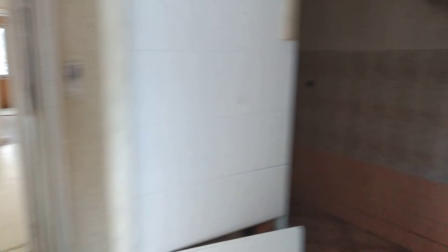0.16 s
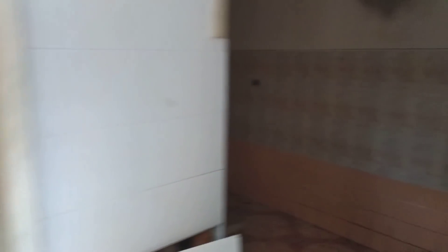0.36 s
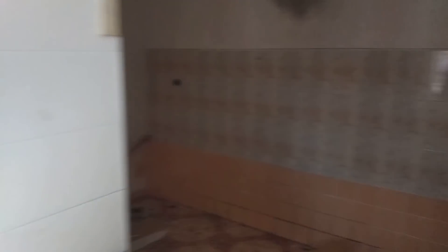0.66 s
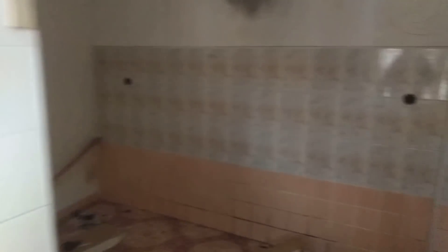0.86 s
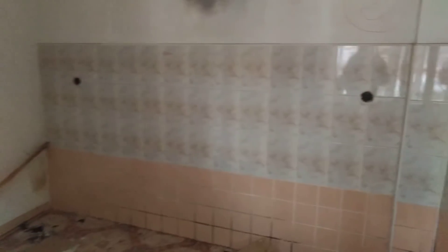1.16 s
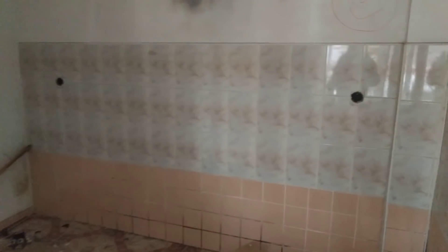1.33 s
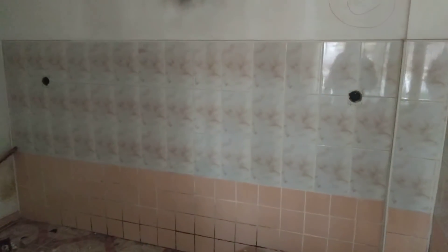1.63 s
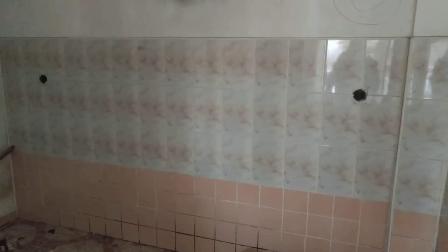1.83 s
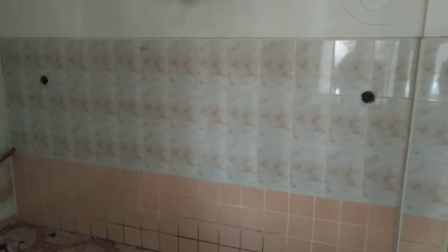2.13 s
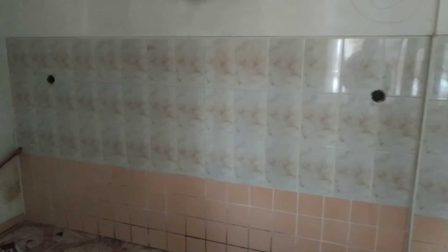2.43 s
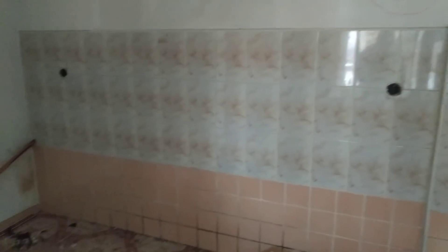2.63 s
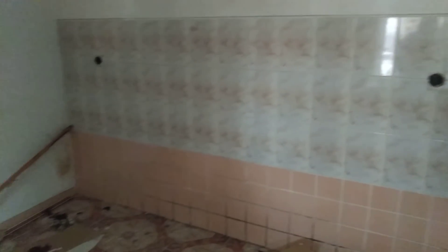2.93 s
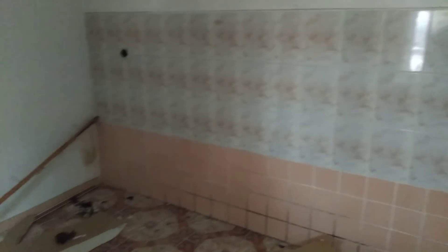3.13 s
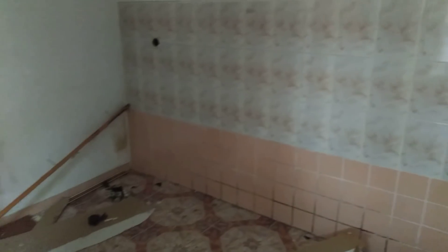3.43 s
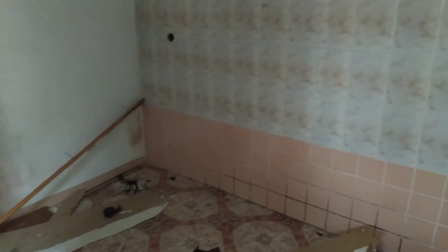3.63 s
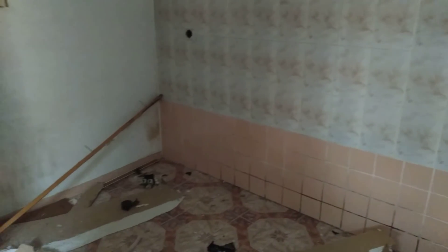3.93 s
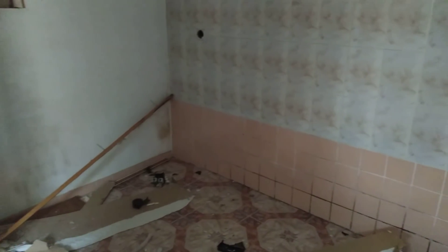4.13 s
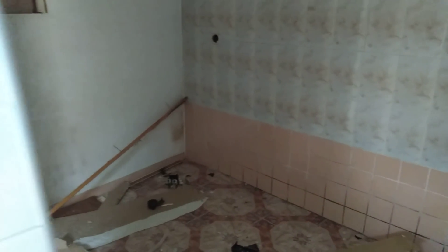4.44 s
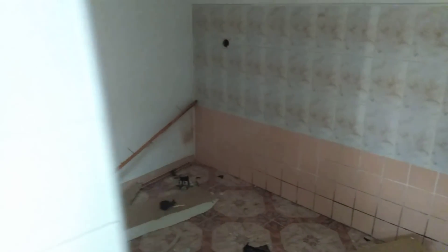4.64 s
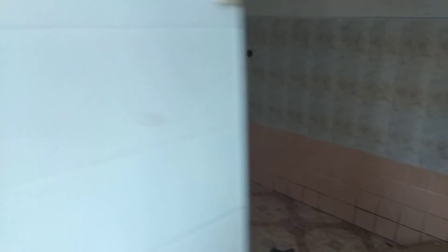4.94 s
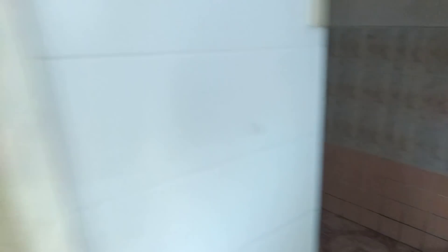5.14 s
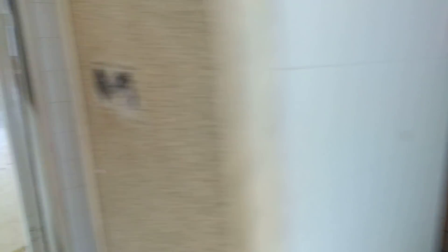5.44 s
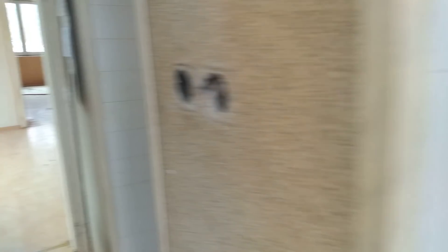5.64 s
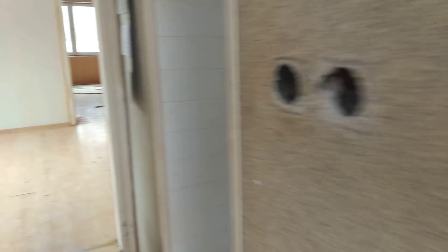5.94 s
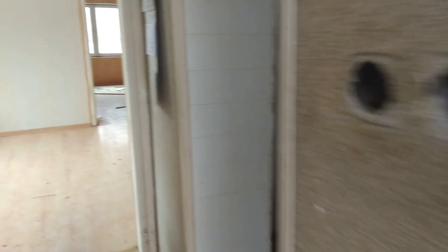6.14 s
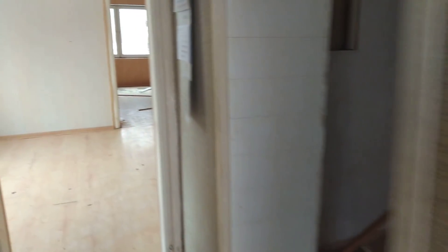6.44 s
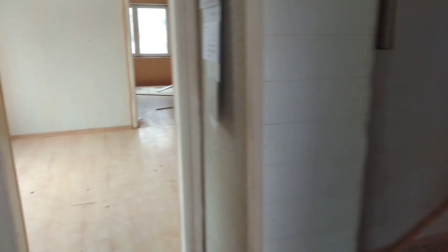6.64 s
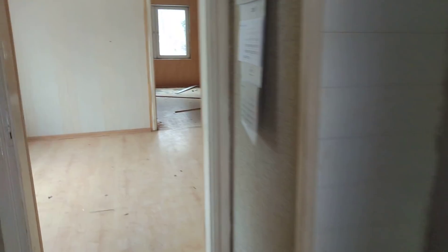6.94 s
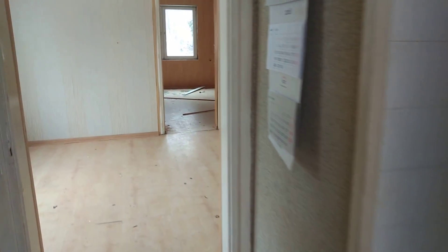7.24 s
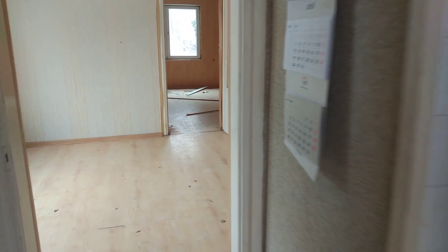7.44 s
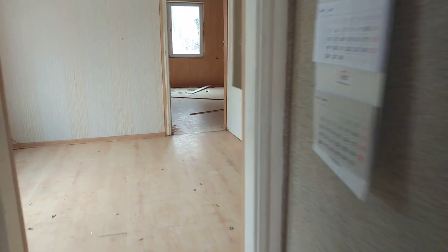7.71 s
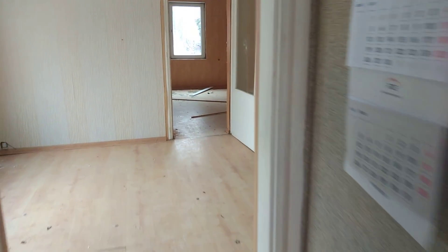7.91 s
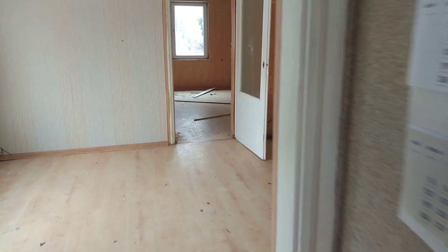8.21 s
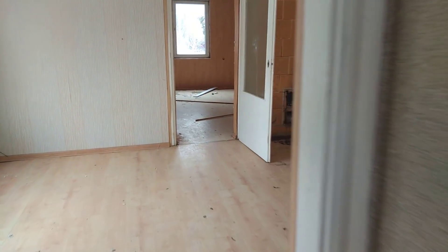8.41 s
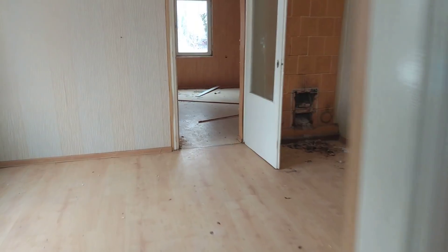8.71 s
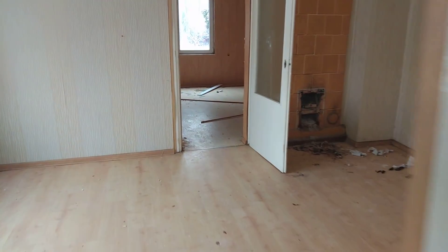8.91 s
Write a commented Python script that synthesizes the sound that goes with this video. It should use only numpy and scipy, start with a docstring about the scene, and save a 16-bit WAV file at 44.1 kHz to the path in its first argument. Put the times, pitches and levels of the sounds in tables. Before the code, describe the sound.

Someone walks slowly over plaster debris, grit and glass shards in empty, hard-walled rooms. After small snaps, a loud burst of crunching comes just after one second, followed by another crunch. Then it thins to light scrapes and isolated clicks, with soft heel thuds on hollow laminate near the end. Close microphone, short bright echoes, faint low rumble and hiss.

```python
"""Shoes grind over broken plaster, grit and glass shards in empty, hard-walled rooms, later over hollow laminate.
Close to the microphone, dense random grain fractures make the grind, and lone bright clicks make the crackle.
Snaps are ticks with fading noise echoes; shards chink as resonances, one faint low room tone rings among them,
and heels push low floor modes. Echoes follow from the walls. A wandering low rumble and a faint coloured hiss
lie under all. The whole level dips briefly at listed moments."""
import sys
import numpy as np
from scipy import signal
from scipy.fft import rfft, irfft
from scipy.io import wavfile

SR = 44100
rng = np.random.default_rng(int(sys.argv[2]) if len(sys.argv) > 2 else 0)


def unload_wav(signal):
    """Save mono or channel-first audio to the path in sys.argv[1] as 16-bit WAV at rate SR, clipped to [-1, 1]."""
    wavfile.write(
        sys.argv[1],
        SR,
        np.round(np.clip(np.atleast_2d(signal).T, -1, 1) * 32767).astype(np.int16),
    )


def nominal_scale(level):
    """Amplitude ratio for a level in decibels (scalar or array-like)."""
    x = np.asarray(level, float) / 20
    return 10 ** x


N = 399987


def at_hz(points, hz):
    """Straight lines on a log-frequency axis."""
    point_hz, values = np.transpose(points)
    return np.interp(np.log(hz), np.log(point_hz), values)


def rms_one(x):
    """Scale to rms 1."""
    return x / np.sqrt(np.mean(x ** 2) + 1e-20)


def in_time(rows):
    """Columns of a curve at every sample."""
    s, *columns = np.transpose(rows)
    return [np.interp(np.arange(N) / SR, s, c) for c in columns]


def band(x, low, high):
    """Butterworth band-pass."""
    return signal.sosfilt(signal.butter(2, [low, high], "band", fs=SR, output="sos"), x + 1e-18)


def ring(clicks, hz, t60):
    """A unit click sets a decaying sine of starting height 1 ringing."""
    radius, turn = nominal_scale(-60 / (t60 * SR)), 2 * np.pi * hz / SR
    return signal.lfilter([0, np.sin(turn)], [1, -2 * radius * np.cos(turn), radius ** 2], clicks + 1e-18)


def drift(rate):
    """Slow random curve: straight lines between knots of spread 1, rate knots per second."""
    knots = rng.standard_normal(int(N / SR * rate) + 2)
    return np.interp(np.arange(N) * rate / SR, np.arange(len(knots)), knots)


def four_zones(dull_db, low_db, bright_db, middle_db):
    """Zone levels; the high middle is set against the mean of its neighbours."""
    return [dull_db, low_db, (low_db + bright_db) / 2 + middle_db, bright_db]


# The dull, low middle, high middle and bright zones of debris sound.
# One list per column: centre_hz; width_hz
ZONE_CENTRE_HZ = [450, 1750, 4600, 10000]
ZONE_WIDTH_HZ = [800, 2000, 4000, 7000]


def band_db(zones_db, low, high):
    """Level in one band, read between the zone levels spread evenly over their widths."""
    centre = np.log(low * high) / 2
    share = [np.interp(centre, np.log(ZONE_CENTRE_HZ), one) for one in np.eye(4)]
    per_hz = [db - 10 * np.log10(width) for db, width in zip(zones_db, ZONE_WIDTH_HZ)]
    thin_db = 2.8 * max(0, np.log2(300 / low))     # small pieces radiate little bass
    return np.tensordot(share, per_hz, axes=1) + 10 * np.log10(high - low) - thin_db


# Grit under the soles, close by; straight lines between the rows.
# Columns: time_s, coarse_grit_db, fine_grit_db, dull_rubble_db
GRIT = [(0.0, -43.5, -42, -52), (0.25, -51.5, -51, -58), (0.45, -52.5, -49, -54), (0.58, -48, -38, -46),
        (0.66, -44.5, -43.5, -56), (0.78, -49, -50, -58.5), (1.03, -64.5, -51, -46), (1.16, -38, -25, -39),
        (1.24, -35.5, -22.5, -40), (1.31, -21.5, -21.5, -34), (1.44, -25, -28, -46),
        (1.51, -33, -34.5, -49.5), (1.72, -41.5, -36, -58), (1.87, -31, -28.5, -38),
        (2.14, -41, -42.5, -52), (2.27, -53.5, -57, -57), (2.63, -59, -49.5, -62),
        (2.88, -62.5, -56, -67.5), (3.31, -45.5, -43.5, -62), (3.53, -53, -37.5, -66),
        (3.81, -57.5, -45.5, -65.5), (4.12, -65, -61, -66), (4.29, -35.5, -39.5, -56),
        (4.5, -42, -41, -60.5), (4.65, -51, -40.5, -57.5), (4.9, -46.5, -45.5, -48.5),
        (5.15, -59, -51.5, -57), (5.3, -53, -39, -61), (5.51, -46.5, -37.5, -39),
        (5.68, -54.5, -62.5, -61.5), (6.04, -59.5, -50, -59.5), (6.27, -45.5, -46, -52),
        (6.39, -52.5, -43, -51), (6.77, -58, -47.5, -56.5), (7.02, -62, -55, -60), (7.12, -63.5, -47, -51),
        (7.7, -43.5, -39, -53.5), (7.85, -45, -39.5, -48.5), (8.13, -51, -48, -53.5),
        (8.46, -66, -46, -52.5), (8.64, -44, -43.5, -53), (9.07, -55.5, -48.5, -50.5)]
GRIT_MIDDLE_DB = -3.5   # high middle of the grit against the mean of its neighbours
BAND_EDGES_HZ = np.geomspace(160, 15000, num=14)


def grind(per_s, patchy_db):
    """Dense random grain fractures; each band has its own grains and its own unevenness."""
    coarse_db, fine_db, dull_db = in_time(GRIT)
    zones = four_zones(dull_db, coarse_db, fine_db, GRIT_MIDDLE_DB)
    out, together = np.zeros(N), drift(40)
    for low, high in zip(BAND_EDGES_HZ, BAND_EDGES_HZ[1:]):
        fractures = rng.choice([-1, 1], N) * (rng.random(N) < per_s / SR)
        grains = rms_one(band(fractures, low, high))
        uneven_db = patchy_db * (together + drift(14))
        out += grains * nominal_scale(band_db(zones, low, high) + uneven_db)
    return out


def crackle():
    """Lone grains pop as bright clicks, in clumps; their strength follows the fine grit level."""
    fine_db = in_time(GRIT)[1]
    sizes = nominal_scale(3.1 * np.minimum(rng.exponential(1, N), 3)) * rng.choice([-1, 1], N)
    per_s = 55 * nominal_scale(6.0 * drift(8))     # the drifting rate makes the clumps
    pops = sizes * (rng.random(N) < per_s / SR)
    return band(pops * nominal_scale(fine_db + 17.5), 6000, 9800)


# Pieces snapping near the microphone; middle_db is the high middle against the mean of knock and snap.
# Columns: start_s, tick_peak_db, knock_echo_db, snap_echo_db, middle_db
SNAPS = [(0.045, -18.5, -39, -42.5, -9), (0.07, -13, -46, -32.5, -0.5), (0.393, -23.5, -72, -39, 10),
         (0.453, -25, -52, -32, -12), (0.505, -18, -42, -31, -16), (0.523, -17, -38.5, -35.5, -35),
         (0.544, -25, -43, -37, -3.5), (0.553, -9.5, -58, -34, -26), (0.571, -16.5, -36.5, -71, -28),
         (0.673, -21.5, -35.5, -38.5, -15), (0.98, -32, -48, -38, 10.5), (0.996, -30, -39, -21, 2),
         (1.071, -12, -34.5, -20.5, 2.5), (1.11, -21, -27, -20, -1), (1.226, -15, -27, -18, -6),
         (1.264, -3.5, -16.5, -18.5, -4), (1.338, 2.5, -19, -15, -5), (1.357, -3, -33, -26, -10),
         (1.679, -13, -22, -20, -8.3), (1.789, -6.5, -26.5, -25.5, -5), (1.899, -37, -28, -24, -3),
         (1.923, -20, -26, -25.5, -5), (2.175, -18.5, -50, -30, -2), (2.418, -30.5, -59, -47, 5.5),
         (2.594, -34, -61, -47, 4), (2.758, -23, -49.5, -38, -1), (2.891, -24, -54.5, -40, 1),
         (3.007, -27, -60, -32.5, 9.5), (3.125, -24.5, -35.5, -36, -6.5), (3.269, -17, -39, -29.5, -1),
         (3.296, -21, -53.5, -42, 16.5), (3.582, -20.5, -46, -38, 1), (3.605, -35, -44.5, -33.5, 4.5),
         (3.783, -35, -63, -46, 6), (3.972, -31, -59.5, -38, 7), (4.08, -28, -51, -39, 3),
         (4.125, -16, -29, -29, -0.7), (4.278, -21, -57, -27.5, 13.5), (4.319, -18, -33, -20, 2.5),
         (4.503, -16.5, -54, -34, 6), (4.674, -41, -41, -36, 2.3), (4.863, -27, -58, -43, 2),
         (5.106, -20, -35.5, -41.5, -4.5), (5.226, -41, -44.5, -42, -4), (5.266, -26, -43, -50, -6),
         (5.33, -17.5, -37, -34, -33), (5.408, -29, -73.5, -52, 20), (5.496, -18, -38.5, -30, -6),
         (5.601, -16.5, -37.5, -37.5, 0.1), (5.872, -7.5, -75, -38, -19), (6.104, -62, -64, -52, -3),
         (6.208, -38, -58, -41, -16), (6.242, -31, -35, -32, -18), (6.417, -25, -46.5, -36, -4.5),
         (6.799, -28, -57.5, -47, 9), (6.847, -26, -72, -45, 7), (6.96, -32, -41, -35.5, -4.5),
         (7.027, -21.5, -40.5, -41, -7.5), (7.116, -33, -42.5, -40.5, -5.5), (7.303, -23.5, -45.5, -36, -3),
         (7.543, -22, -70, -48, -13), (7.601, -33, -63, -37, -13), (7.659, -26, -45, -32.5, -5),
         (8.192, -32, -52, -46, -1), (8.423, -16, -38.5, -18.5, 0.1), (8.429, -3, -46, -23, -12),
         (8.443, -11, -39, -22.5, -2.8), (8.629, -42.5, -51, -38, -12), (8.803, -28, -43.5, -36, -5),
         (8.886, -21, -50.5, -31, -11), (8.893, -10, -67, -46, -14)]
# How long the hard walls hold an echo, also used by room().
# Columns: pitch_hz, t60_s
ECHO_T60 = [(150, 0.28), (700, 0.38), (3000, 0.45), (12000, 0.35)]
SNAP_DULL_DB = -9    # dull zone of a snap against its knock
DULL_FOLLOWS = 0.3   # the duller a snap, the more of it reaches the lowest zone


def cracks(tick_s, build_s):
    """Each snap is a tick of its own colour; its echoes are noise that builds up fast and dies band by band."""
    s, peak_db, knock_db, snap_db, middle_db = np.transpose(SNAPS)
    dull_db = knock_db + SNAP_DULL_DB + DULL_FOLLOWS * (knock_db - snap_db)
    zones = four_zones(dull_db, knock_db, snap_db, middle_db)
    total_db = 10 * np.log10(np.sum(nominal_scale(np.array(zones)) ** 2, axis=0))
    at = (s * SR).astype(int)
    white, out = rng.standard_normal((2, N)), np.zeros(N)
    quick, build = np.exp(-1 / (tick_s * SR)), np.exp(-1 / (build_s * SR))
    for k, (low, high) in enumerate(zip(BAND_EDGES_HZ, BAND_EDGES_HZ[1:])):
        level_db = band_db(zones, low, high)
        ticks, echoes = np.zeros(N), np.zeros(N)
        ticks[at] = nominal_scale(peak_db + level_db - total_db) ** 2 / 4     # a noisy tick peaks at about twice its rms
        echoes[at] = nominal_scale(level_db) ** 2
        fade = nominal_scale(-120 / (at_hz(ECHO_T60, np.sqrt(low * high)) * SR))     # 60 dB down in power after t60
        # powers of unrelated echoes add
        power = signal.lfilter([1], [1, -quick], ticks + 1e-18)
        power += signal.lfilter([1 - build], np.convolve([1, -fade], [1, -build]), echoes + 1e-18)
        whole_band = np.sqrt(SR / 2 / (high - low))     # makes up for the noise outside the band
        out += band(white[k % 2] * np.sqrt(power), low, high) * whole_band
    return out


# Blows on pieces of glass, tile and plaster; at 2.417 s a faint low room tone rings instead.
# Levels are relative, before the mix. Columns: start_s, blow_db
BLOWS = [(0.045, -20.5), (0.067, -25), (0.981, -8.5), (1.076, 0), (1.129, -3), (1.27, 7), (1.342, -3),
         (1.682, -8.5), (2.417, -12.5), (2.759, -32), (3.012, -19.5), (4.08, -23), (4.126, -20.5),
         (4.502, -15.5), (5.106, -26), (5.266, -28.5), (5.333, -17), (5.409, -25), (5.498, -23),
         (5.601, -11), (5.871, -7.5)]
# The resonances each blow sets ringing, one list per blow, in the same order:
# those of the struck piece, or at 2.417 s the single room tone.
# Columns: pitch_hz, width_hz, relative_db
RESONANCES = [
    [(1300, 500, -3), (13000, 500, 1)],
    [(7800, 900, 19), (11500, 400, 10), (13000, 500, 10)],
    [(7700, 200, 8), (9400, 50, 3), (12200, 80, 0), (12840, 60, -3)],
    [(9930, 100, -3), (12300, 50, -5), (13840, 60, -5)],
    [(6380, 40, 0)],
    [(7700, 300, -3), (6500, 200, -10), (10300, 200, -8)],
    [(1224, 150, 1), (2200, 350, 3)],
    [(800, 350, 1), (11900, 300, -3)],
    [(460, 10, -14)],
    [(3100, 500, 4)],
    [(7400, 900, 8), (6000, 500, 0)],
    [(7800, 900, 8), (1100, 400, -3)],
    [(2000, 300, 15), (1750, 200, 13)],
    [(6800, 1800, 3)],
    [(1150, 300, 4)],
    [(3500, 1200, 6)],
    [(3500, 1200, 6)],
    [(3500, 1200, 6)],
    [(3500, 1200, 6)],
    [(3994, 110, 9), (5006, 50, -2), (10360, 30, -8), (10840, 30, -10)],
    [(6000, 900, -24), (8947, 70, -2), (11900, 300, -3)],
]
SKIRT = 0.95   # a resonance falls away steeply beyond this many widths


def shards_and_room_tone():
    """One blow rings its list of resonances; a wide one dies fast and starts higher for the same energy."""
    out = np.zeros(N)
    for (s, blow_db), modes in zip(BLOWS, RESONANCES):
        tap, tone = np.zeros(SR // 2), np.zeros(SR // 2)
        tap[0] = nominal_scale(blow_db)
        for hz, width_hz, db in modes:
            t60 = np.log(1000) / (np.pi * width_hz)
            mode = band(ring(tap, hz, t60), hz - SKIRT * width_hz, hz + SKIRT * width_hz)
            tone += nominal_scale(db) * np.sqrt(width_hz / 50) * mode
        at = int(s * SR)
        out[at:at + SR // 2] += tone[:N - at]
    return out


# Heels on the floor; level_db sets the push.
# Columns: start_s, level_db, pitch_hz, t60_s
HEELS = [(1.68, -17, 271, 0.048), (1.684, -15.5, 406, 0.066), (1.689, -22, 184, 0.059),
         (1.9, -52, 335, 0.069), (5.106, -33, 397, 0.049), (6.205, -28, 173, 0.034),
         (6.239, -25.5, 165, 0.028), (6.505, -33, 61.9, 0.046), (6.957, -25.5, 117, 0.038),
         (7.019, -31, 151, 0.031), (7.125, -39, 70.0, 0.06), (7.299, -32.5, 93, 0.062),
         (7.832, -26.5, 89.5, 0.04), (7.898, -37, 87, 0.089), (7.969, -29.5, 61.9, 0.088),
         (8.106, -30, 67.4, 0.075), (8.624, -24, 192, 0.046), (8.731, -24.5, 61, 0.025)]


def thuds(overtone, overtone_db):
    """The floor boards answer a soft push with a low mode and a weaker higher one."""
    out, push = np.zeros(N), np.zeros(SR // 2)
    push[:60] = np.hanning(60) / 30     # area about 1
    for s, level_db, hz, t60 in HEELS:
        t60 = max(t60, .02)
        tone = ring(push, hz, t60) + nominal_scale(overtone_db) * ring(push, overtone * hz, t60)
        at = int(s * SR)
        out[at:at + SR // 2] += nominal_scale(level_db) * tone[:N - at]
    return out


def room(x, onset_s):
    """Dense wall echoes: noise that builds up over onset_s and dies band by band; energy 1."""
    t, edges = np.arange(SR) / SR, np.geomspace(50, 16000, num=9)
    white, tail = rng.standard_normal(SR), np.zeros(SR)
    for low, high in zip(edges, edges[1:]):
        t60 = at_hz(ECHO_T60, np.sqrt(low * high))
        tail += band(white, low, high) * nominal_scale(-60 * t / t60)
    tail *= 1 - np.exp(-t / onset_s)
    return signal.fftconvolve(x, tail / np.sqrt(np.sum(tail ** 2)))[:N]


# Low rumble behind the steps: level of its tone before the waver.
# Columns: time_s, level_db
RUMBLE_LEVEL = [(0.0, -35), (0.25, -40), (0.4, -47), (0.81, -37), (1.24, -58), (1.31, -49), (2.12, -61.5),
                (3.31, -52.5), (3.79, -57.5), (6.01, -46.5), (6.14, -67), (6.24, -42), (6.44, -59),
                (6.52, -47), (6.77, -62), (6.99, -53), (7.75, -64), (7.83, -53), (8.16, -49), (8.26, -48),
                (8.44, -41), (8.49, -56), (8.74, -39), (8.82, -51), (8.97, -36), (9.07, -48)]
STEADY_DB, WAVER_PER_DB = -37, 0.2582   # steady from this level up; the fainter below it, the more it wavers


def rumble(rough_db):
    """A low tone that wanders in pitch and wavers in level, with noise around it."""
    pitch_hz = 59 + 2.5 * drift(6.8)
    tone = np.sqrt(2) * np.sin(2 * np.pi * np.cumsum(pitch_hz) / SR)
    rough = rms_one(band(rng.standard_normal(N + SR), 40.0, 102.5)[SR:])     # skips the filter's start
    level_db, = in_time(RUMBLE_LEVEL)
    waver_db = WAVER_PER_DB * np.maximum(STEADY_DB - level_db, 0) * drift(14.0)
    return (tone + nominal_scale(rough_db) * rough) * nominal_scale(level_db + waver_db)


# Colour of the faint background hiss; only the shape counts.
# Columns: pitch_hz, relative_db (per Hz)
HISS_COLOUR = [(18, -21), (30, 15.5), (65, 8.5), (120, 0.5), (354, -3), (656, -53), (3150, -7), (4520, -52),
               (11100, -13), (14000, -13)]


def hiss():
    """Steady coloured noise at an rms of -52.5 dB."""
    hz = np.fft.rfftfreq(N, 1 / SR) + 1
    coloured = irfft(rfft(rng.standard_normal(N)) * nominal_scale(at_hz(HISS_COLOUR, hz)), N)
    return nominal_scale(-52.5) * rms_one(coloured)


# The small first room favours one low band until the walker leaves it.
# Columns: low_hz, high_hz, added_db, until_s
FIRST_ROOM = (330, 420, -5, 5.8)


def small_room(debris):
    """A close room resonance adds one low band of the debris sound."""
    low_hz, high_hz, added_db, until_s = FIRST_ROOM
    inside = np.arange(N) < until_s * SR
    return nominal_scale(added_db) * band(debris * inside, low_hz, high_hz)


def scene():
    """Near sources, their echoes, rumble and hiss."""
    grit = grind(per_s=2200, patchy_db=1.0)
    debris = grit + cracks(tick_s=.0015, build_s=.007)
    ringing = shards_and_room_tone()
    heels = thuds(overtone=1.8, overtone_db=-16)
    echoes = room(nominal_scale(-13.5) * grit + nominal_scale(-5.5) * ringing + nominal_scale(3.0) * heels, onset_s=0.012)
    near = debris + small_room(debris) + crackle() + nominal_scale(-18.5) * ringing + heels
    return (near + echoes + rumble(rough_db=-9) + hiss())[None]


def low_pass(x):
    """Removes everything above the highest recorded frequency."""
    return signal.sosfilt(signal.butter(12, 15130, fs=SR, output="sos"), x)


# The whole level dips briefly; overlapping dips add.
# Columns: start_s, end_s, depth_db
LEVEL_DIPS = [(0.346, 0.406, 5.5), (0.945, 0.977, 3.5), (2.711, 2.752, 11), (5.063, 5.104, 1.5),
              (5.818, 5.842, 14), (5.844, 5.864, 13), (6.061, 6.086, 7), (6.09, 6.102, 20),
              (6.12, 6.17, 10.5), (6.162, 6.209, 9.5)]
TOP = .78   # peaks are rounded towards this height


def record(dry):
    """The microphone drops deep bass and lifts the top; the level dips, peaks are rounded, the top is cut."""
    t, dip_db = np.arange(N) / SR, np.zeros(N)
    for start, end, depth_db in LEVEL_DIPS:
        dip_db -= depth_db * np.interp(t, [start - .008, start + 0.0085, end - .003, end], [0, 1, 1, 0])
    sensed = signal.sosfilt(signal.butter(3, 40, "high", fs=SR, output="sos"), dry)
    sensed = sensed + nominal_scale(-15.5) * band(sensed, 8880, 14300)     # treble lift
    rounded = TOP * np.tanh(sensed * nominal_scale(dip_db) / TOP)
    top_cut = signal.ellip(12, .5, 60, 14050, fs=SR, output="sos")
    mix = signal.sosfilt(top_cut, rounded)
    return low_pass(mix)


dry = scene()
out = record(dry)
unload_wav(out)
```